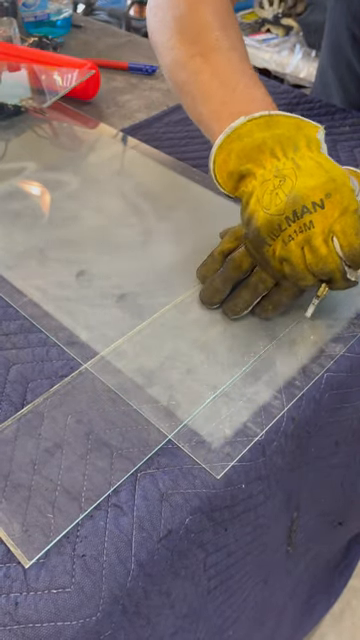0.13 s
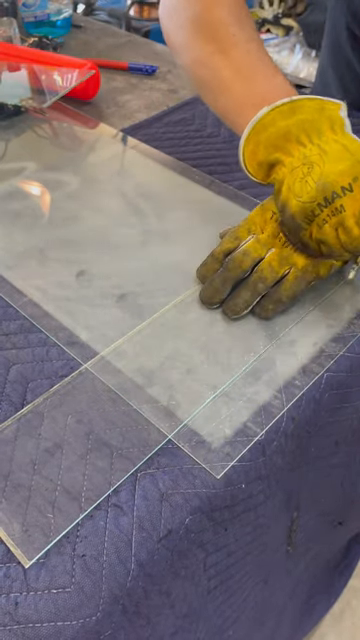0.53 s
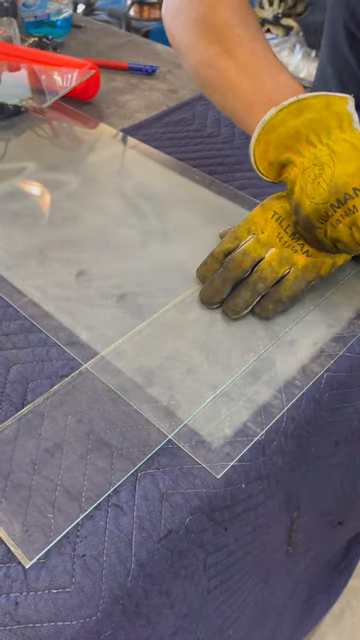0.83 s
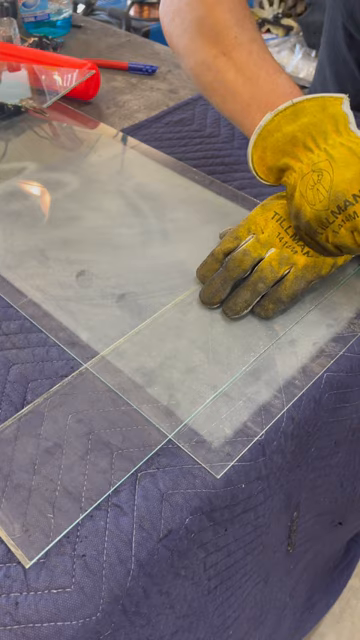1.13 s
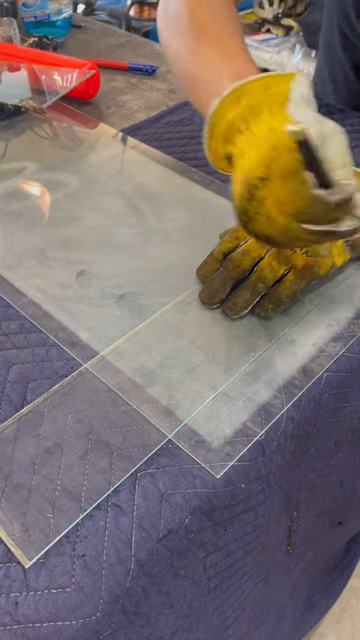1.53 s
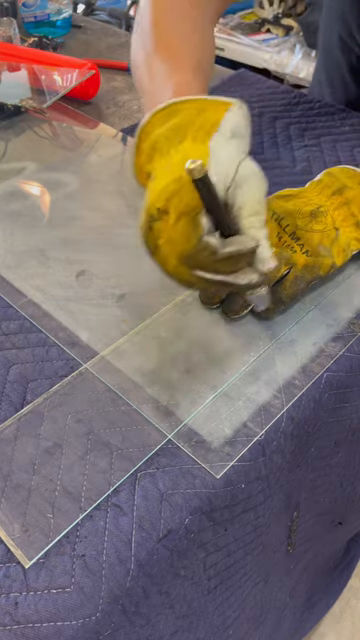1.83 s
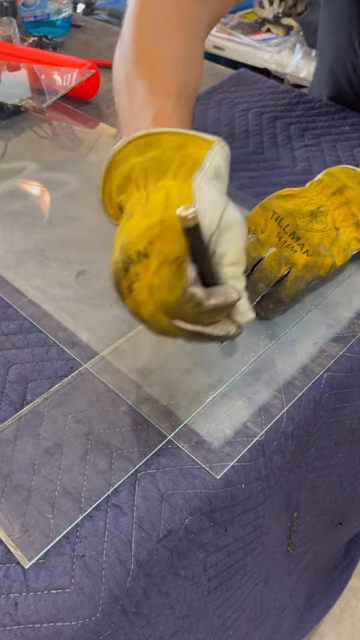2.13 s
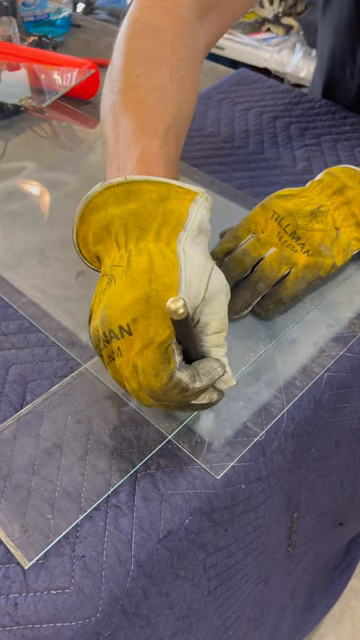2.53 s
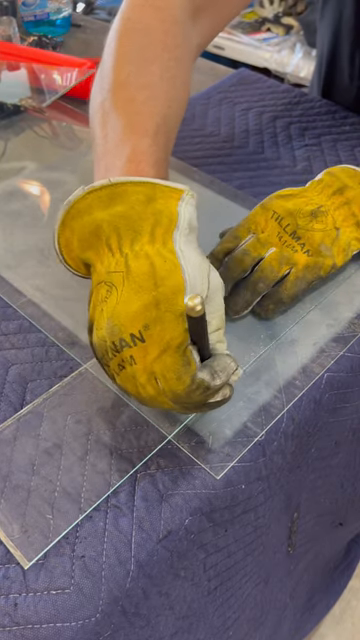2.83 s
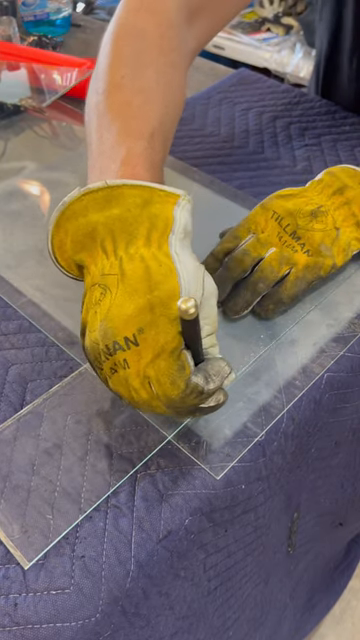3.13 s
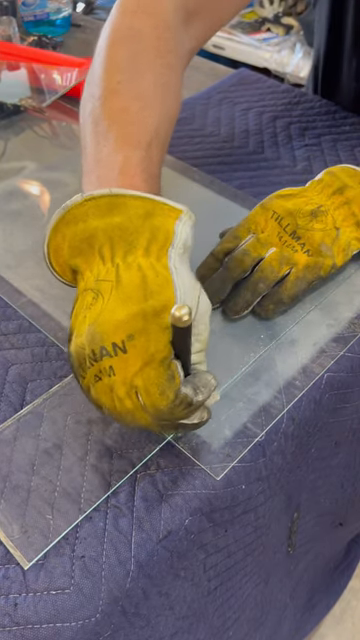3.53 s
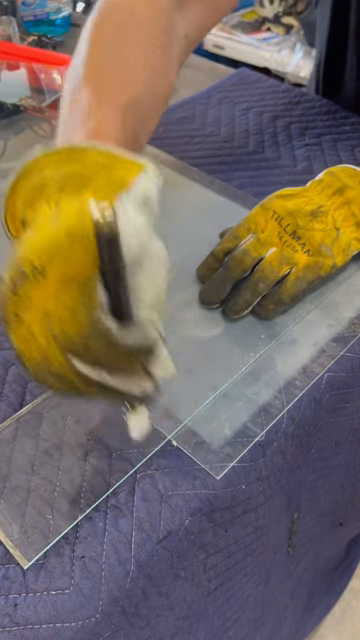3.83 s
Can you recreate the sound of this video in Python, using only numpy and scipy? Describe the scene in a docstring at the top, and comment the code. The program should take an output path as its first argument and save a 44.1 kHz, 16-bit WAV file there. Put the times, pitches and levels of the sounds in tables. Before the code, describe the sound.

Glass cutter wheel scratches fast across a glass pane, stutters, clacks, pauses, then chips and clacks again

```python
"""A gloved hand scores a glass sheet on a padded blanket in a quiet workshop with a low hum and rumble.
First a fast stroke: dense tiny cracks under the cutter wheel, with a broad ring that climbs in pitch.
The wheel stutters to a crawl in short pushes and bright chips, then drops off the edge with a clack.
It is set down again with a few taps and faint scrapes, and chips through a short last stretch.
It clacks off the edge and the sheet rings in damped low sines; a soft rustle of tiny cracks closes."""
import sys
import numpy as np
from scipy import signal
from scipy.fft import rfft, irfft
from scipy.io import wavfile
from scipy.ndimage import uniform_filter1d

SR = 44100
rng = np.random.default_rng(int(sys.argv[2]) if len(sys.argv) > 2 else 0)


def log_audio(samples):
    """Write samples as a 16-bit WAV file to the path given in sys.argv[1]."""
    # one column per channel
    frames = np.atleast_2d(samples).T
    # limit to full scale, then quantise
    limited = np.clip(frames, -1, 1)
    pcm = np.round(limited * 32767).astype(np.int16)
    wavfile.write(sys.argv[1], SR, pcm)


N = 176400
TIME_S = np.arange(N) / SR
TAPS = 2048
HZ = np.fft.rfftfreq(TAPS, 1 / SR)

# wheel pressure in the fast stroke [t/s, level/dB]
FAST_PRESSURE = [(0, -28), (.022, -34.5), (.046, -28), (.11, -29), (.15, -26.5), (.167, -52), (.18, -27.5),
                 (.215, -32.5), (.23, -26), (.315, -30.5), (.40, -31.5), (.43, -25.5), (.478, -30.5),
                 (.5, -49)]
# curves of crawling wheel pushes and faint scrapes; the last is a soft closing rustle [t/s, level/dB]
CRAWL_AND_RUSTLE_LEVELS = [
    [(.544, -24), (.549, -25.5), (.579, -33), (.587, -48), (.601, -27.5), (.616, -49)],
    [(.649, -44), (.662, -28.5), (.675, -28.5), (.685, -32), (.712, -26), (.74, -35), (.766, -40.5)],
    [(1.118, -31), (1.132, -46), (1.145, -29), (1.168, -43.5), (1.175, -75), (1.26, -54)],
    [(2.925, -55), (2.958, -66.5), (2.978, -33), (2.994, -66), (3.04, -49.5)],
    [(3.908, -49), (3.93, -57.5), (4, -61)],
]
# wheel pressure in the last stretch [t/s, level/dB]
LAST_PRESSURE = [(3.13, -64), (3.16, -52), (3.21, -63.5), (3.262, -55), (3.31, -56.5), (3.38, -43),
                 (3.405, -62), (3.47, -37.5), (3.515, -42.5), (3.574, -38.5)]
# ring of the wheel in the fast stroke [t/s, f/Hz, level/dB]
WHEEL_RING = [(.21, 6200, -42), (.26, 7160, -29), (.305, 7500, -27.5), (.36, 8550, -35.5),
              (.43, 10300, -24.5), (.485, 10200, -23)]
# forward slips that chip the glass [t/s, length/s, level/dB]
CHIP_EVENTS = [(0.524, 0.007, -24.5), (0.768, 0.0075, -30), (.801, 0.0029, -29), (0.835, 0.0023, -27.5),
               (0.849, 0.0088, -30), (0.864, 0.0019, -29.5), (0.874, 0.0032, -20.5), (0.879, 0.011, -30),
               (0.9192, 0.0018, -27.5), (0.972, 0.0019, -31.5), (0.982, 0.009, -34.5), (1, .004, -31.5),
               (1.021, 0.0063, -33.5), (1.16, 0.0036, -28.5), (1.211, 0.0085, -43), (1.255, 0.0084, -43.5),
               (1.363, 0.0016, -39.5), (2.431, 0.022, -46), (2.481, 0.024, -37.5), (2.961, 0.0042, -32.5),
               (3.219, 0.0034, -37), (3.261, 0.0048, -31), (3.320, 0.0015, -37), (3.341, 0.005, -31),
               (3.427, 0.0054, -32), (3.432, 0.0063, -32.5), (3.493, 0.0024, -28.5), (3.5, 0.0093, -26.5),
               (3.529, 0.003, -22), (3.691, 0.0097, -41.5), (3.891, 0.0036, -44)]
# cutter head on sheet [t/s, length/s, bass level/dB, middle level/dB, treble level/dB]
KNOCK_EVENTS = [(0.5, 0.014, -38.5, -40.5, -28), (0.5633, 0.004, -25.5, -31, -52),
                (1.096, 0.0036, -40, -31, -17.5), (1.1004, 0.0079, -29, -26.5, -15),
                (1.119, 0.0034, -37.5, -38, -35), (1.2874, 0.0022, -39.5, -32.5, -31),
                (2.417, 0.0028, -26.5, -31, -23), (2.47, .002, -35, -42, -35.5),
                (2.578, 0.0099, -41.5, -49.5, -43), (2.594, 0.0056, -38, -44.5, -31.5),
                (2.7475, 0.0019, -39, -46, -54), (2.878, 0.0034, -37.5, -52, -66.5),
                (2.9825, 0.0036, -38.5, -41, -27), (3.5729, 0.004, -17, -18, -9.5),
                (3.5841, 0.0016, -17.5, -49, -14)]
# sheet let go, drops back on the blanket [t/s, level/dB]
SHEET_DROPS = [(1.106, -54.5), (3.578, -37)]
# modes of the sheet [f/Hz, relative level/dB, t60/s]
SHEET_MODES = [(150, -2, 0.52), (276.5, 1.5, 0.31), (334.5, 2.5, .33), (406, -9.5, 0.36), (520, -1.5, 0.45),
               (638, 2.5, 0.33), (861, -6, 0.4)]
# relative spectrum of the fast stroke [f/Hz, level/dB]
FAST_SPECTRUM = [(60, -39), (300, -20), (600, -12.5), (1500, -14.5), (3200, -12), (4800, -13), (7200, -3.5),
                 (9000, -3.5), (11100, -1), (12700, -9), (13500, -16.5), (15600, -20)]
# relative spectrum of chips, crawl, scrapes and rustle [f/Hz, level/dB]
CHIP_SPECTRUM = [(60, -51), (250, -25), (600, -20), (1600, -21), (3100, -14), (4800, -12), (6200, -16.5),
                 (8100, -4), (10900, 1), (13500, -24.5), (15800, -29)]
# relative spectrum of the last stretch [f/Hz, level/dB]
LAST_SPECTRUM = [(60, -28), (450, -11.5), (1500, -17.5), (4500, -16.5), (7000, -14), (10300, -4),
                 (11400, -14), (12300, -16.5), (15500, -51)]
# relative spectrum of a knock before its ranges are levelled [f/Hz, level/dB]
KNOCK_SPECTRUM = [(60, -12.5), (200, -7.5), (540, -1), (950, -2.5), (1200, -2.5), (1450, -1.5),
                  (2300, -1.5), (4300, -8), (6500, -3), (10700, 1), (12500, -8), (16000, -20)]
# decay of the room [f/Hz, t60/s]
ROOM_DECAY = [(150, 0.41), (14000, .3)]
# strength of the room tail [f/Hz, level/dB]
ROOM_LEVEL = [(100, -6.5), (500, -7.5), (1400, -13), (7000, -14), (11000, -20), (15000, -25.5)]
# part of the room that differs between ears [f/Hz, ratio to shared part]
ROOM_SPREAD = [(100, .12), (700, .7), (1800, .4), (4300, .7), (9000, .45)]
# relative spectrum of the rumble [f/Hz, level/dB]
RUMBLE_SPECTRUM = [(20, -22), (40, -8.5), (70, 2.5), (270, -10), (600, -16.5), (1100, -24.5), (2300, -30.5),
                   (3300, -44.5), (15000, -57.5)]
# part of the rumble that differs between ears [f/Hz, ratio to shared part]
RUMBLE_SPREAD = [(80, .04), (550, .5), (8000, .9)]
# low hum [t/s, rms level/dB]
HUM_LEVEL = [(.7, -66), (1, -52), (1.8, -66), (3.7, -59)]
# phase lead of the left port [f/Hz, phase/rad]
PORT_LEAD = [(0, 0), (800, -.15), (2500, .15), (3900, .55), (5600, 5.8), (8500, 9.15), (9700, 9.7),
             (12000, 12.45), (13400, 12.6), (15200, 15.6)]
# left minus right port [f/Hz, level/dB]
PORT_LEVEL = [(100, 0), (1000, 1), (2300, 0), (3900, -2.7), (5700, .3), (8000, 0)]

GRAINS_PER_S, GRAIN_SPREAD_DB = 10000, 3  # tiny fractures
JUDDER_DB, JUDDER_S = 1.5, .0027  # wheel grips and slips
LAST_JUDDER_DB = 3.6  # a slow wheel grips and slips harder
LURCH_DB, LURCH_S = 1, .012  # hand pushes unevenly
RING_POLE_WIDTH_HZ = 1200
CREEP_S, CHIP_CREEP_DB = .007, -20.5  # wheel creeps briefly before it slips
ATTACK_S, RELEASE_S = .00079, .00078
BASS_HZ, TREBLE_HZ = 1360, 5030  # the three ranges of a knock meet here
TOP_HZ, TOP_HZ_PER_DB = 18700, 170  # treble limit of a knock at 0 dB; lighter knocks are duller
TRAVEL_S = .0013  # bending-wave travel time at 1 kHz
ECHO_BEND_S, ECHO_T60_S, ECHO_DB = .008, .036, -1  # bending part of edge-echo delay at 1 kHz, its decay
SCATTER_DB = -17
HUM_HZ, RUMBLE_DB = 86.7, -54.5
BAND_LIMIT_HZ = 15500


def amp(db):
    """Decibels to gain."""
    return 10 ** (np.asarray(db) / 20)


def unit(x):
    """Scales to rms 1."""
    return x / np.sqrt(np.mean(x ** 2) + 1e-20)


def read(points, hz):
    """Reads a table on a log-frequency axis."""
    f, value = np.transpose(points)
    return np.interp(np.log(hz + 1), np.log(f + 1), value)


def add(mix, start_s, sound):
    """Mixes a sound in at a time."""
    part = mix[max(round(start_s * SR), 0):][:len(sound)]
    part += sound[:len(part)]


def levelled(x, length_s, db):
    """Gives a short sound the energy of that level held for that length."""
    return x / np.linalg.norm(x) * np.sqrt(abs(length_s) * SR) * amp(db)


def colour(gain):
    """Causal (minimum-phase) impulse response of energy 1 with the given relative gains."""
    log_gain = np.log(np.maximum(np.r_[gain, gain[-2:0:-1]], 1e-5))
    taps = np.fft.ifft(np.exp(np.conj(signal.hilbert(log_gain)))).real
    return taps / np.linalg.norm(taps)


def evened(x, bins=36):
    """Evens out broad peaks and dips of a short sound, so that it clacks without a pitch."""
    power = uniform_filter1d(abs(rfft(x, 2 * TAPS)) ** 2, bins)[::2]
    return signal.fftconvolve(x, colour(1 / np.sqrt(abs(power) + 1e-12)))


def widen(shared, differing, width):
    """Left and right from a shared and a differing part."""
    left, right = shared + width * differing, shared - width * differing
    return np.array([left, right]) / np.sqrt(1 + width ** 2)


def wander(step_s):
    """Smooth chance of rms 1 that changes about once in that time."""
    lowpass = signal.butter(2, .5 / step_s, fs=SR, output="sos")
    return unit(signal.sosfiltfilt(lowpass, rng.standard_normal(N)))


def stroke(levels, tone, judder_db=JUDDER_DB, count=5):
    """A run of cracks, coloured and carried through the sheet; the sheet's echoes change along it."""
    s, db = np.transpose(levels)
    cracks = crackle(s, db, judder_db)
    place = np.interp(TIME_S, [s[0], s[-1]], [0, count - 1])
    out, body = np.zeros(N), colour(tone)
    for k in range(count):
        taps = signal.fftconvolve(glass(), body)
        taps /= np.linalg.norm(taps)
        crossfade = np.sqrt(np.maximum(1 - abs(place - k), 0))
        out += signal.oaconvolve(cracks * crossfade, taps)[:N]
    return out


def crackle(s, db, judder_db=JUDDER_DB):
    """Tiny cracks follow a level curve, a fast judder and the slower lurches of the hand."""
    grip = amp(judder_db * wander(JUDDER_S) + LURCH_DB * wander(LURCH_S))
    active = (TIME_S >= s[0]) * (TIME_S < s[-1])
    return unit(fractures(N) * grip) * amp(np.interp(TIME_S, s, db)) * active


def fractures(size):
    """A dense train of tiny cracks of random sign and uneven strength."""
    chance, sign, strength = rng.random((3, size))
    spread = np.minimum(-np.log(strength + 1e-9), 4)
    cracks = (chance < GRAINS_PER_S / SR) * np.sign(sign - .5)
    return unit(cracks * amp(GRAIN_SPREAD_DB * spread))


def glass(count=10):
    """Bending waves from one spot: treble arrives first, and the edges send back fading echoes."""
    place, sign = rng.random((2, count))
    delay_s = ECHO_BEND_S * (np.arange(count) + place) / count
    size = np.sign(sign - .5) * amp(-60 * delay_s / ECHO_T60_S)
    size *= amp(ECHO_DB) / np.linalg.norm(size)
    bend = -4j * np.pi * np.sqrt(HZ * 1000)
    # each echo also lags by half its bending delay, alike at all frequencies
    echoes = size @ np.exp(delay_s[:, None] * (bend - 1j * np.pi * HZ))
    taps = irfft(np.exp(bend * TRAVEL_S) * (1 + echoes))[:TAPS // 2]
    return taps / np.linalg.norm(taps)


def sing():
    """The cracks excite a broad two-pole ring that climbs along the fast stroke."""
    s, hz, db = np.transpose(WHEEL_RING)
    turn = np.exp(2j * np.pi * np.cumsum(np.interp(TIME_S, s, hz)) / SR)
    r = np.exp(-np.pi * RING_POLE_WIDTH_HZ / SR)
    # filter at 0 Hz, then shift back up to the moving pitch
    ring = signal.lfilter([1], [1, -2 * r, r * r], crackle(s, db) / turn)
    noise_gain = np.sqrt(2 * (1 - r * r) ** 2 * (1 - r * r) / (1 + r * r))
    return (turn * ring).real * noise_gain


def burst(length_s, creep_db=-40):
    """A short run of cracks after a faint lead-in, carried through the sheet."""
    t = np.arange(TAPS) / SR - CREEP_S
    creep = amp(creep_db) * np.minimum(1 + t / CREEP_S, 1)
    shape = np.clip(t / ATTACK_S, 0, 1) + creep
    release = np.exp(-np.maximum(t - length_s, 0) / RELEASE_S)
    return signal.fftconvolve(fractures(TAPS) * shape * release, glass())


def chips():
    """Short bright slips of the wheel: bursts of cracks with an evened, then coloured spectrum."""
    out, body = np.zeros(N), colour(amp(read(CHIP_SPECTRUM, HZ)))
    for s, length_s, db in CHIP_EVENTS:
        chip = signal.fftconvolve(evened(burst(length_s, CHIP_CREEP_DB)), body)
        add(out, s - CREEP_S, levelled(chip, length_s, db))
    return out


def knocks():
    """Metal meets glass: an even, gritty clack; the harder it lands, the higher its treble reaches."""
    out, tone = np.zeros(N), amp(read(KNOCK_SPECTRUM, HZ))
    bass = 1 / (1 + (HZ / BASS_HZ) ** 8)
    below_treble = 1 / (1 + (HZ / TREBLE_HZ) ** 8)
    for s, length_s, *levels_db in KNOCK_EVENTS:
        top_hz = max(TOP_HZ + TOP_HZ_PER_DB * levels_db[-1], TREBLE_HZ)
        below_top = 1 / (1 + (HZ / top_hz) ** 6)
        ranges = bass, (1 - bass) * below_treble, (1 - below_treble) * below_top
        contact = evened(burst(length_s))
        for share, db in zip(ranges, levels_db):
            part = signal.fftconvolve(contact, colour(tone * share))
            add(out, s - CREEP_S, levelled(part, length_s, db))
    return out


def sheet(rise_s=.0062, width=.49):
    """The low modes of the sheet, damped by the blanket; each reaches the ears with its own phase."""
    out, t = np.zeros((2, N)), np.arange(SR // 2) / SR
    for s, level_db in SHEET_DROPS:
        for part in out:
            ring = np.zeros(len(t))
            for hz, db, t60_s in SHEET_MODES:
                ring += amp(db - 60 * t / t60_s) * np.sin(2 * np.pi * (hz * t + rng.random()))
            add(part, s, amp(level_db) * ring * (1 - np.exp(-t / rise_s)))
    return widen(*out, width)


def scatter(near):
    """Near reflections that differ between ears: opposite signs left and right."""
    echoes = irfft(rfft(glass(), TAPS) * read(ROOM_SPREAD, HZ))[:TAPS // 2]
    side = amp(SCATTER_DB) * signal.oaconvolve(near, echoes)[:N]
    return np.array([side, -side])


def diffuse(x, turn_s=.011, count=2):
    """Feeds several tails in turn, so that the room does not ring in fixed bands."""
    out = np.zeros((2, N))
    for k in range(count):
        feed = np.sqrt(2 / count) * np.cos(np.pi * (TIME_S / turn_s + k / count))
        out += room(x * feed)
    return out


def room(x, first_s=.008, build_s=.0038, echoes_per_s=4000):
    """The workshop's short tail, each band dying at its own speed; gives left and right."""
    t = np.arange(SR * 2 // 3) / SR
    taps = rng.standard_normal((2, len(t))) * (rng.random((2, len(t))) < echoes_per_s / SR)
    taps *= np.clip((t - first_s) / build_s, 0, 1)
    hz, at_s, bands = signal.stft(taps, SR, nperseg=256)
    t60_s, gain = read(ROOM_DECAY, hz)[:, None], amp(read(ROOM_LEVEL, hz))
    bands = bands * amp(-60 * at_s / t60_s) * gain[:, None] / np.sqrt(t60_s)
    ears = widen(bands[0], bands[1], read(ROOM_SPREAD, hz)[:, None])
    tail = signal.istft(ears, SR, nperseg=256)[1]
    tail *= np.sqrt(np.mean(gain ** 2)) / np.linalg.norm(tail[0])
    return signal.fftconvolve(x[None], tail, axes=1)[:, :N]


def background():
    """Low room rumble of shaped noise, with a sine hum that comes and goes."""
    hz = np.fft.rfftfreq(N, 1 / SR)
    shared, differing = rfft(rng.standard_normal((2, N))) * amp(read(RUMBLE_SPECTRUM, hz))
    rumble = unit(irfft(widen(shared, differing, read(RUMBLE_SPREAD, hz)), N))
    hum_gain = amp(np.interp(TIME_S, *np.transpose(HUM_LEVEL)))
    hum = hum_gain * np.sqrt(2) * np.sin(2 * np.pi * HUM_HZ * TIME_S)
    return amp(RUMBLE_DB) * rumble + hum


def scene():
    """Cutter, sheet and closing rustle in the workshop."""
    strokes = stroke(FAST_PRESSURE, amp(read(FAST_SPECTRUM, HZ)))
    strokes += stroke(LAST_PRESSURE, amp(read(LAST_SPECTRUM, HZ)), LAST_JUDDER_DB)
    for levels in CRAWL_AND_RUSTLE_LEVELS:
        strokes += stroke(levels, amp(read(CHIP_SPECTRUM, HZ)))
    near = strokes + sing() + chips() + knocks()
    return near + diffuse(near) + scatter(near) + sheet() + background()


def record(dry):
    """A pair of microphone ports that differ in phase and level, then the band limit."""
    size = N + TAPS * 2
    hz = np.fft.rfftfreq(size, 1 / SR)
    lead = np.interp(hz, *np.transpose(PORT_LEAD))
    half = amp(read(PORT_LEVEL, hz) / 2) * np.exp(.5j * lead)
    ports = irfft(rfft(dry, size) * np.array([half, 1 / half]))[:, :N]
    lowpass = signal.firwin(255, BAND_LIMIT_HZ, window=("kaiser", 9), fs=SR)
    return signal.oaconvolve(ports, lowpass[None], "same")


dry = scene()
out = record(dry)
log_audio(out)
```